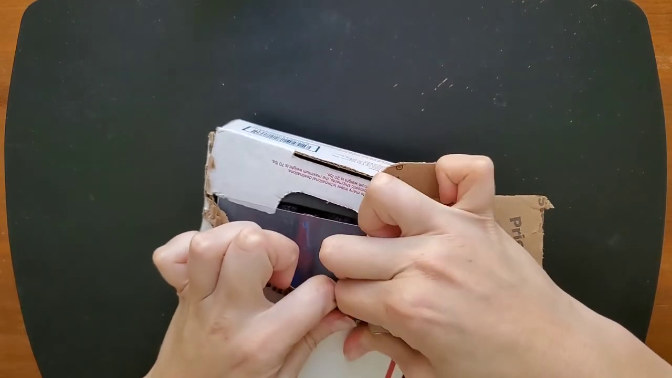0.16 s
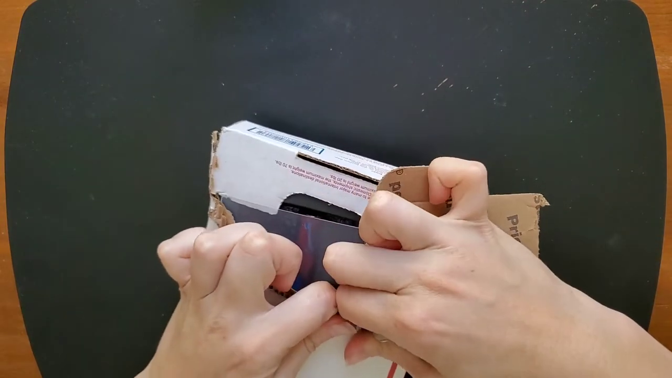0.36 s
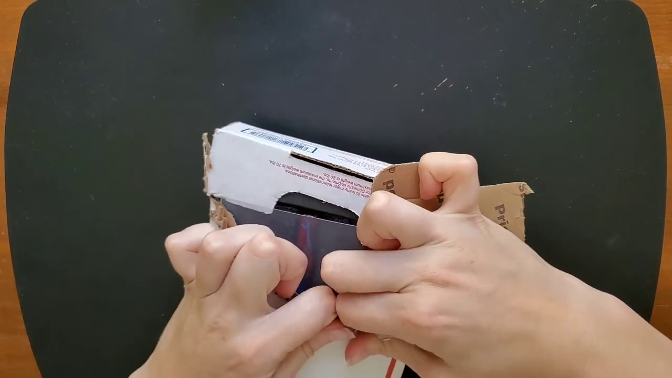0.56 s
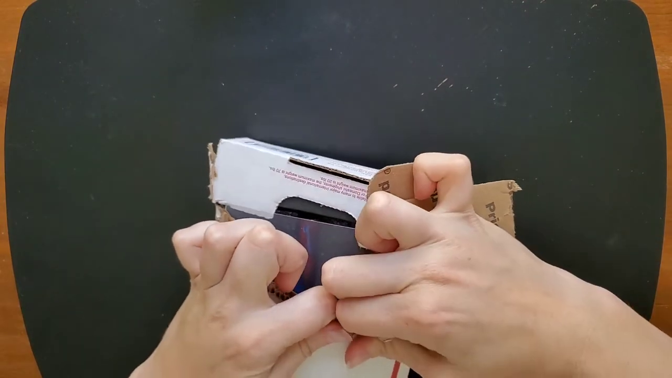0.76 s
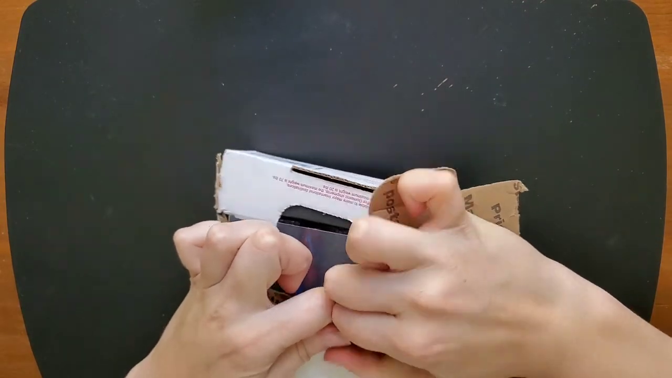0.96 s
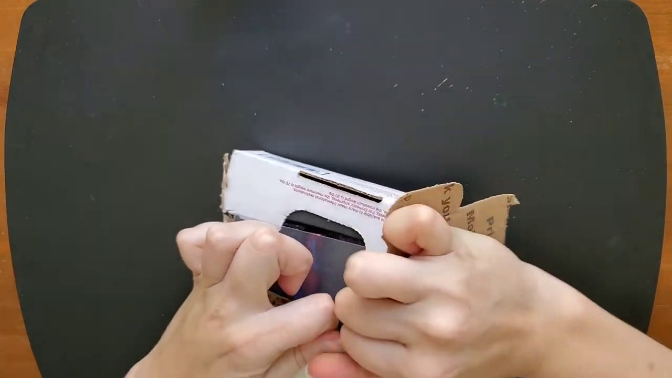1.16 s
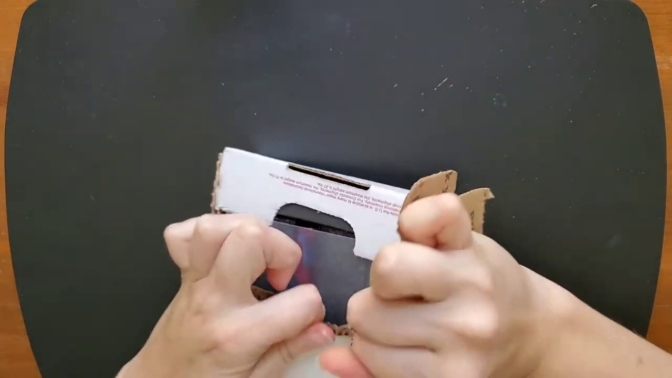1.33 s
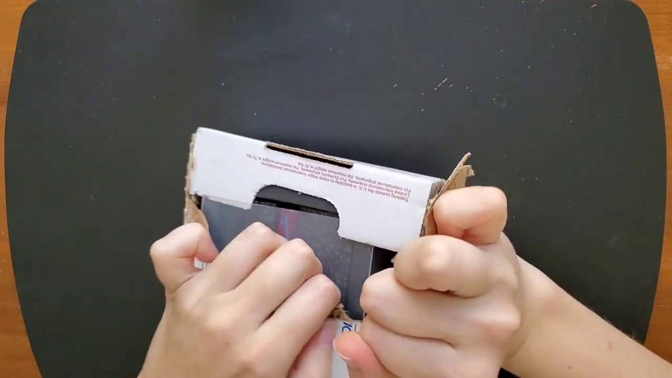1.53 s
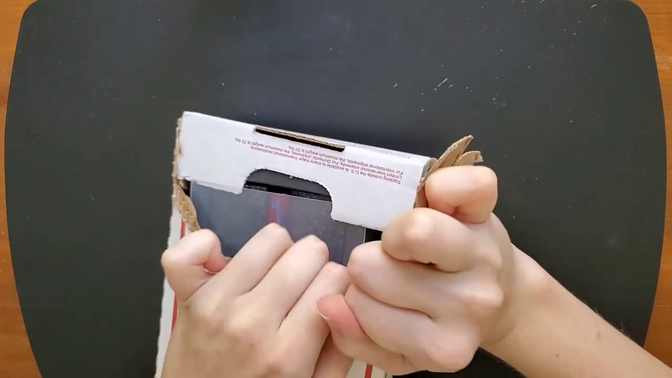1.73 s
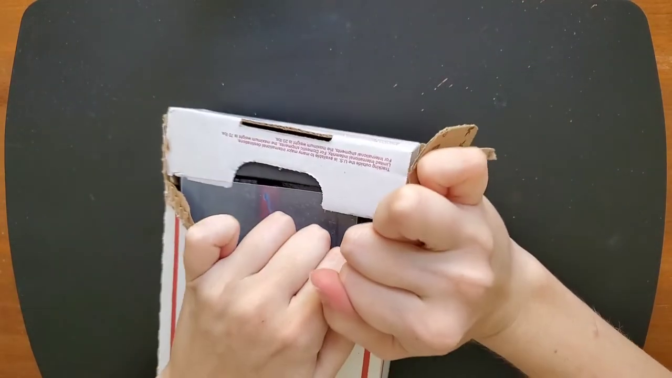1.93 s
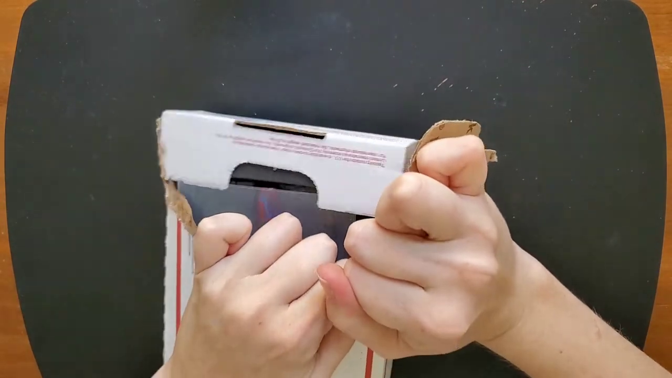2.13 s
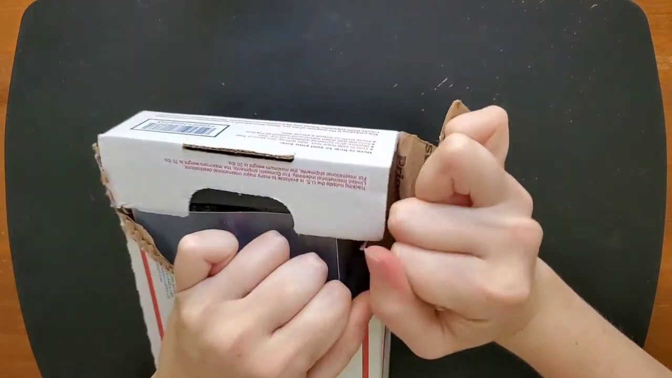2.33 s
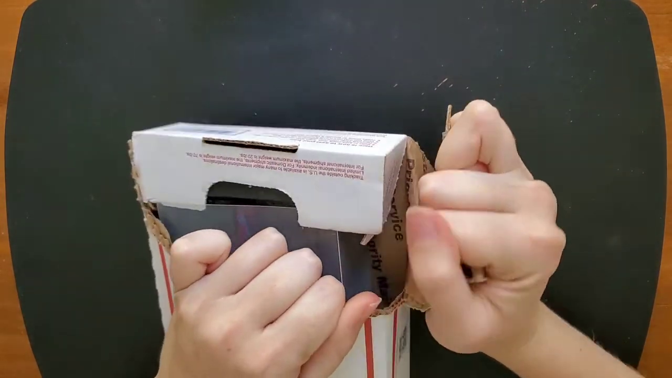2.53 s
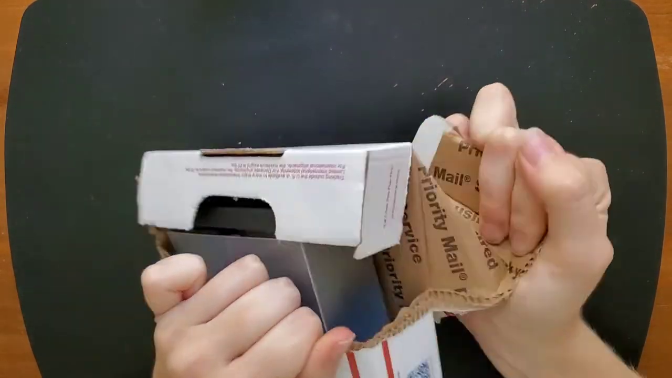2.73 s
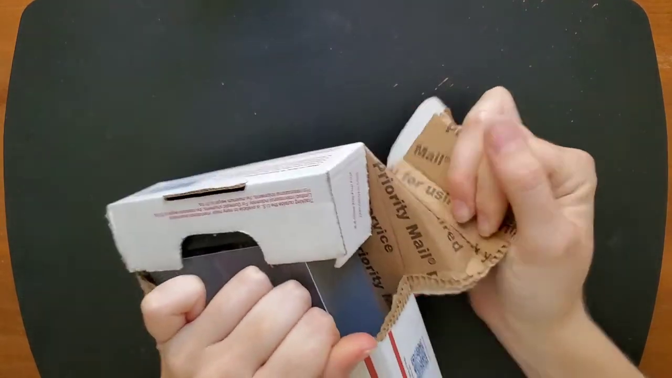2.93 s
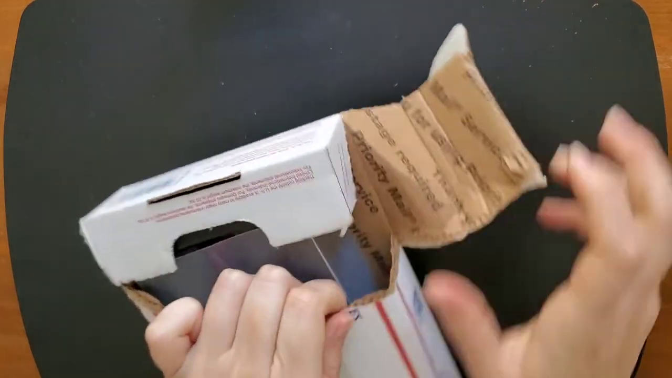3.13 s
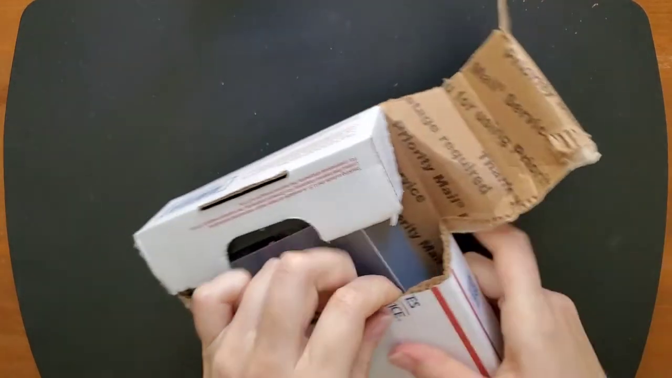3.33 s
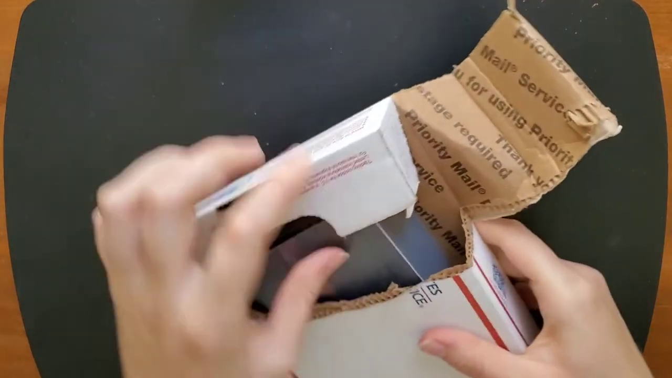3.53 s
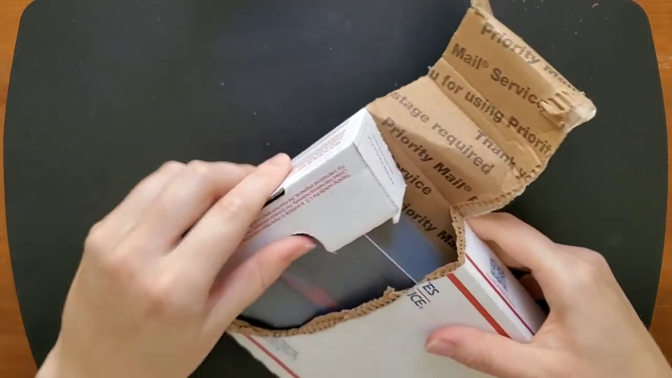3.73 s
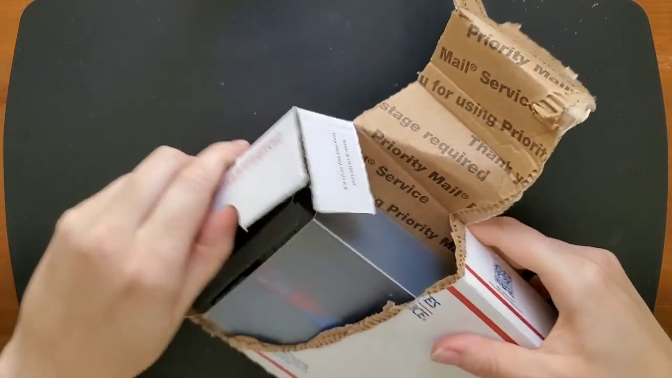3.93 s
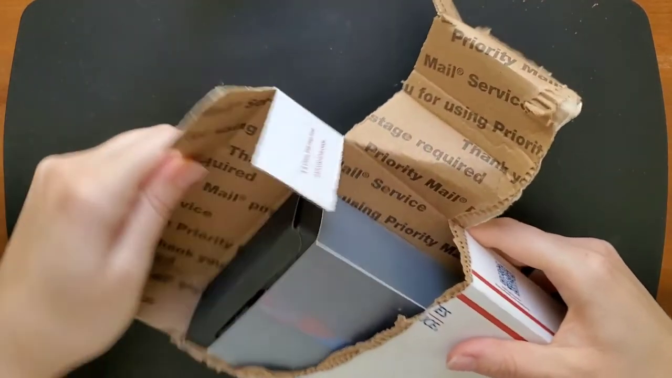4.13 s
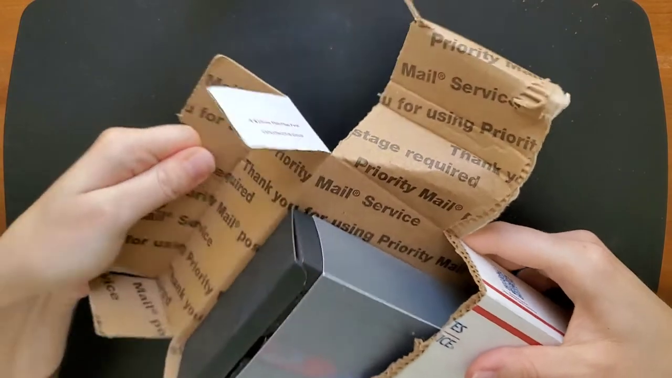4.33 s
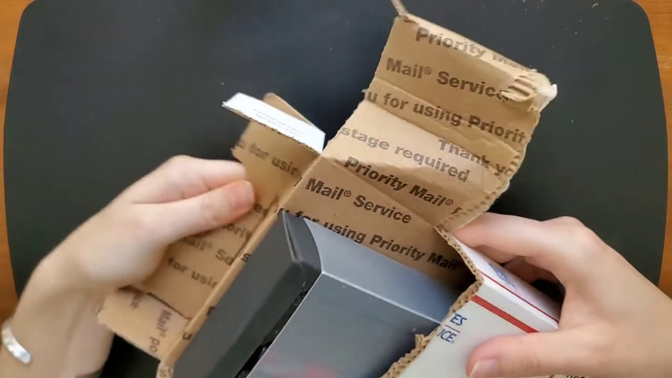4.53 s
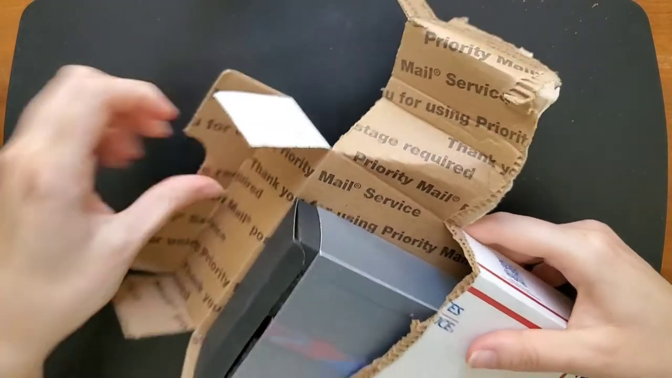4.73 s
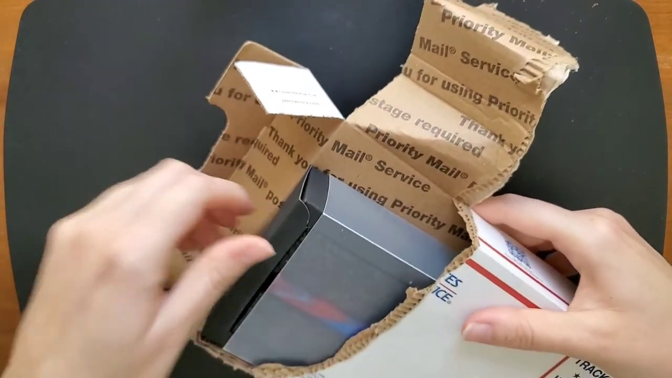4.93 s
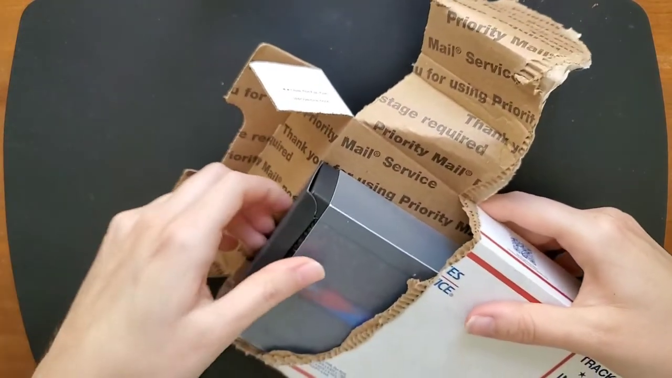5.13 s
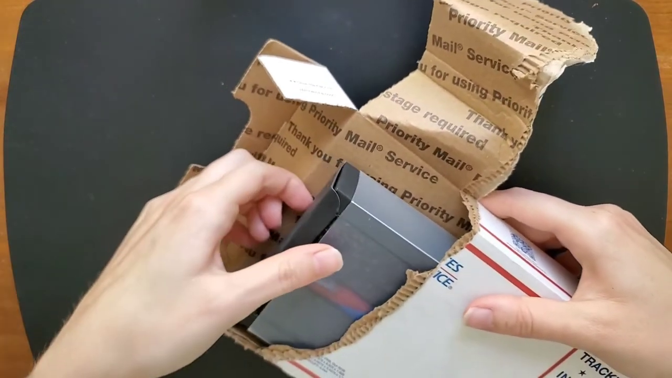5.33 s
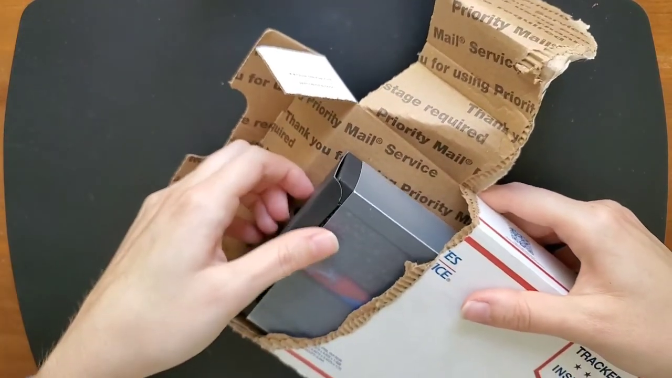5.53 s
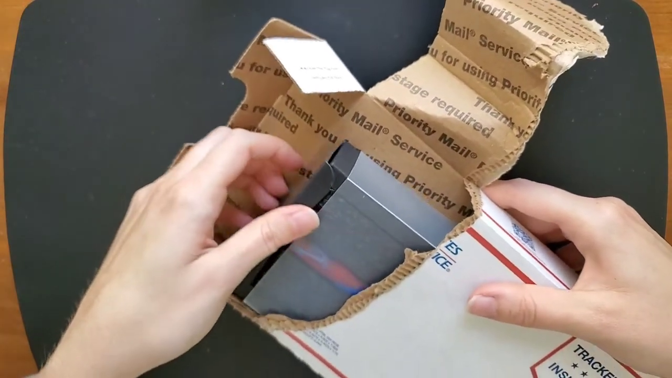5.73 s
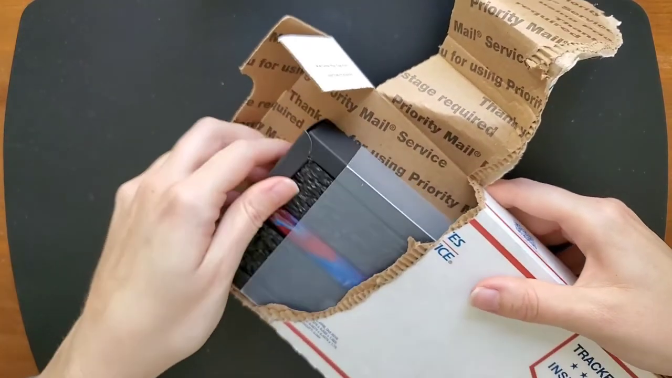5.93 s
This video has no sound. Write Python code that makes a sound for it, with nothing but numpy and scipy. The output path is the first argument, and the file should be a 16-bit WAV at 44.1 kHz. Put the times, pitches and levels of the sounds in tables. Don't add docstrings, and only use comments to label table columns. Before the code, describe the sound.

Close stereo pickup in a small furnished room, with a faint bed of still air. From the start a corrugated box is worked open: low crackles and dull seam pops, then a loud hollow snap around 0.57 s and another pop near 0.65. From 0.85 to 1.1 s come clusters of crunchy ticks with a soft desk bump, then a hard, crisp rip at about 1.26 s. Lighter creaks and crackles fill 1.4 to 2.2 s. A sharp, bright tear bursts at 2.3 s with a low thump, and a dense splitting rip peaks around 2.75 s. After 3 s the force eases: flap flicks, a dull knock near 3.17, papery scrapes around 3.6 to 4.2. A near lull at 4.3 to 4.7 s follows, then quiet fingertip rubbing on a smooth inner box, a distinct pop near 5.08 and small scuffs and ticks around 5.9 s until the end.

```python
import sys
import numpy as np
from scipy import signal
from scipy.fft import rfft, irfft, next_fast_len
from scipy.io import wavfile
from scipy.ndimage import uniform_filter1d, map_coordinates

SR = 44100
rng = np.random.default_rng(int(sys.argv[2]) if len(sys.argv) > 2 else 0)


def natural_amplitude(level_db):
    exponent = np.asarray(level_db, float) / 20
    return 10 ** exponent


def digitize_waveform(pressure):
    field = np.atleast_2d(pressure).T
    bounded = np.clip(field, -1, 1)
    quanta = np.round(bounded * 32767).astype(np.int16)
    wavfile.write(sys.argv[1], SR, quanta)


N = 267246


def unit(x):
    return x / np.sqrt(np.mean(x ** 2) + 1e-20)


def over_time(points):
    return np.interp(np.arange(N) / SR, *np.transpose(points))


def along(points, hz):
    f, v = np.transpose(points)
    return np.interp(np.log(hz + 1), np.log(f + 1), v)


def wobble(rate):
    knots = rng.standard_normal(int(N * rate / SR) + 4)
    return map_coordinates(knots, [np.arange(N) * rate / SR])


def filtered(x, response):
    m = next_fast_len(x.shape[-1] + 4096)
    spectrum = rfft(x, m) * response(np.fft.rfftfreq(m, 1 / SR))
    return irfft(spectrum, m)[..., :x.shape[-1]]


def resonance(f, hz, width):
    return 1j * f * width / (hz * hz - f * f + 1j * f * width)


# [f/Hz, likeness 0-1]
PORT_LIKENESS = [(60, 1), (300, 0.74), (1000, 0.24), (3000, 0.092), (15000, 0.049)]


def ports(a, b):
    turn = lambda f: np.arccos(np.clip(along(PORT_LIKENESS, f), -1, 1)) / 2
    mid = filtered(a, lambda f: np.cos(turn(f)))
    side = filtered(b, lambda f: np.sin(turn(f)))
    return np.array([mid + side, mid - side])


# [f/Hz, level/dB per Hz]
AIR_COLOUR = [(15, -62.5), (25, -9.5), (92, -10.5), (134, -40), (195, -15.5), (936, -35), (1070, -23),
              (1840, -35), (2690, -31.5), (16000, -37)]
HUSH_DB = -64.5


def hush():
    air = ports(*rng.standard_normal((2, N)))
    return natural_amplitude(HUSH_DB) * unit(filtered(air, lambda f: natural_amplitude(along(AIR_COLOUR, f))))


# [t/s, force (1 ripping, 0 sliding)]
GRIP_FORCE = [
    (0, 1.07),
    (3.0, 1.035),
    (3.6, 1.16),
    (4.3, 0.83),
    (6.1, 0.19),
]


def grip():
    return over_time(GRIP_FORCE)


# [strongest t/s, level/dB, swell/ms, fade/ms, brightness/dB]
TUGS = [(.09, -47.5, 174, 320, -3), (.19, -51.5, 65, 57, 2), (.38, -46, 110, 124, -1.5),
        (.56, -37, 70, 170, -6.5), (.67, -40.5, 110, 130, 0), (.85, -44, 19, 1100, -9.5),
        (.95, -40, 110, 300, -0.5), (1.04, -42, 210, 110, -5), (1.16, -59, 120, 93, -9),
        (1.26, -24.5, 32, 80.5, 2.5), (1.43, -61, 20, 480, -4), (1.66, -48.5, 470, 500, -0.5),
        (1.909, -45.5, 90, 99, -5.5), (2.08, -48, 190, 180, -5.5), (2.284, -29.5, 49, 60, -2.5),
        (2.316, -21, 14, 50, -1), (2.349, -34, 40, 96, -0.5), (2.51, -58, 88, 76, 9.5),
        (2.583, -40, 15, 150, 2.5), (2.721, -34, 95, 100, 3), (2.762, -19.5, 42, 82.5, 2.5),
        (2.87, -46, 66, 180, 1.5), (3.05, -44, 83, 84, 4.5), (3.097, -55.5, 50, 125, 13.5),
        (1.275, -38, 30, 67, -9), (2.569, -47.5, 4, 20, 3.5), (.47, -45.5, 12, 57, -8.5),
        (1.58, -48, 40, 120, -6)]
# [strongest t/s, level/dB, swell/ms, fade/ms, brightness/dB]
SLIDES = [(3.2, -55, 66, 116, 10), (3.33, -55, 130, 89, 8.5), (3.47, -50, 130, 270, 5.5),
          (3.579, -48, 34, 32, 8), (3.633, -41, 17, 30, -11), (3.775, -49.5, 12, 180, -1),
          (3.887, -39, 118, 79, 0.5), (3.95, -47, 44, 79, 2), (4.039, -44, 55, 30, -0.5),
          (4.199, -41.5, 105, 45, -3), (4.25, -61.5, 67, 73, 8.5), (4.55, -62.5, 160, 670, 5),
          (4.643, -52, 120, 240, 3), (4.8, -58, 160, 90, -4), (4.951, -55, 32, 46, 5.5),
          (5.01, -56.5, 37, 41, 4.5), (5.09, -43, 24, 45, -2.5), (5.135, -60.5, 52, 370, 7),
          (5.311, -45, 110, 88, -5), (5.418, -44.5, 170, 54, -3.5), (5.629, -52, 87, 250, 0.5),
          (5.759, -47, 140, 300, -1), (5.889, -37, 81, 96, 0), (6.03, -41.5, 100, 150, -4),
          (3.37, -63, 100, 96, -15), (3.62, -54.5, 60, 80, -12.5), (3.96, -49.5, 66, 71, -11),
          (4.72, -53.5, 40, 50, -4.5)]
# [level/dB, slope/dB per dB of brightness, change when only sliding/dB]
DRIVE = [
    (-0.4, -0.05, 2),
    (-3.5, .5, 0.5),
    (-5, 1.38, -1.9),
    (-4.5, -0.88, -2.5),
]
STILL_DB = -72.5
BEND = 1.18


def control(column):
    t = np.arange(0, N / SR + .001, .001)
    s, db, swell_ms, fade_ms, bright_db = np.transpose(TUGS + SLIDES)[:, :, None]
    offset_db, slope, slide_db = DRIVE[column - 1]
    only_sliding = (np.arange(len(s)) >= len(TUGS))[:, None]
    away = 1000 * np.abs(t - s) / np.where(t < s, swell_ms, fade_ms)
    stroke_db = db + slide_db * only_sliding + slope * bright_db - 20 * away ** BEND
    power = natural_amplitude(2 * stroke_db).sum(axis=0) + natural_amplitude(2 * STILL_DB)
    return np.interp(np.arange(N) / SR, t, offset_db + 10 * np.log10(power))


def grains(density, spread_db, life):
    sizes = np.minimum(rng.exponential(size=N), 2.5)
    starts = (rng.random(N) < density / SR) * natural_amplitude(spread_db * sizes)
    power = signal.lfilter([1], [1, -np.exp(-2 / (life * SR))], starts ** 2)
    return np.sqrt(np.abs(power))


def showers():
    life_s, strength = 0.006, 2.2
    starts = np.zeros(N)
    for rows in (SEAMS, BUCKLES, CRACKS, FLICKS, SLIPS):
        for row in rows:
            starts[min(round(row[0] * SR) + 60, N - 1)] = strength
    burst = 1 + signal.lfilter([1], [1, -np.exp(-1 / (life_s * SR))], starts)
    return burst / np.sqrt(uniform_filter1d(burst ** 2, size=2600))


def ringing(breaks, modes, wander_db):
    shake = ports(*(breaks * rng.standard_normal((2, N))))
    total = np.zeros((2, N))
    for k, (hz, width, db) in enumerate(modes):
        push = shake * natural_amplitude(wander_db * wobble(14))
        total += (-1) ** k * natural_amplitude(db) * filtered(push, lambda f: resonance(f, hz, width))
    return unit(total)


def coloured(envelope, points):
    noise = ports(*(envelope * rng.standard_normal((2, N))))
    return unit(filtered(noise, lambda f: natural_amplitude(along(points, f))))


def patchy(x, depth_db):
    z = signal.stft(x, nperseg=256)[2]
    field = uniform_filter1d(rng.standard_normal(z.shape[1:]), size=5, axis=0)
    field = uniform_filter1d(field, size=9, axis=1)
    return unit(signal.istft(z * natural_amplitude(depth_db * unit(field)), nperseg=256)[1][:, :N])


# [f/Hz, width/Hz, level/dB]
WALLS = [(616, 47, -2), (810, 43, 1), (937, 81, -1.5), (1110, 123, -2), (1270, 260, -4.5)]
# [f/Hz, width/Hz, level/dB]
FLUTES = [(1560, 170, 0.5), (1880, 290, 2.5), (2140, 154, 2.5), (2415, 210, 1), (2900, 510, -1),
          (3700, 1490, -5.5)]
# [f/Hz, level/dB per Hz]
FIBRE = [(1760, -8.5), (3000, -4.5), (3310, -7.5), (4500, -6.5), (4970, -7.5), (5520, -5.5), (7830, -7),
         (9460, -18.5), (11400, -10.5), (14800, -8.5), (16000, -18)]
# [f/Hz, level/dB per Hz]
HOLLOW = [(110, -51.5), (180, -15.5), (512, 1.5), (566, -6), (616, -21.5), (750, 0), (980, -33),
          (1650, -120)]


def tearing():
    force = np.clip(grip(), 0, 1.5)
    shower = showers()
    breaks = unit(grains(410, 2.6, 0.0035)) * natural_amplitude(1.5 * wobble(30.09))
    breaks = breaks ** (0.67 * force)

    wall_breaks = shower * (breaks + 0.13) * np.clip(force + 0.19, 0, 1)
    walls = natural_amplitude(control(column=1) - 3.5) * ringing(wall_breaks, WALLS, wander_db=2.6 * force)

    flute_breaks = shower * (breaks + 0.5) * np.clip(force + 0.37, 0, 1)
    flutes = natural_amplitude(control(column=2) + 1.0) * ringing(flute_breaks, FLUTES, wander_db=2.8 * force)
    small = filtered(flutes, lambda f: 1 / (1 + (2300 / (f + 1)) ** 8))
    flutes = flutes - np.clip(0.65 * (1 - force), 0, 1) * small

    fibre = patchy(coloured(shower * (breaks + 0.72), FIBRE), depth_db=2.0)
    fibre = natural_amplitude(control(column=3) + 1.5) * fibre
    sheen = filtered(fibre, lambda f: 1 / (1 + (7500 / (f + 1)) ** 4))
    fibre = fibre - np.clip(0.65 * (1.1 - force), 0, 1) * sheen

    hollow = coloured(shower * (breaks + 0.11) * natural_amplitude(5.3 * wobble(11)), HOLLOW)
    hollow = natural_amplitude(control(column=4) - 2.0) * hollow

    push = rng.standard_normal(N) * natural_amplitude(7.5 * wobble(24) + 0.37 * control(column=4))
    modes = lambda f: sum(natural_amplitude(db) * resonance(f, hz, 2.0 / t60 + 8) for hz, db, t60 in DESK)
    desk = natural_amplitude(-59.0) * force ** 2 * unit(filtered(push, modes))
    return walls + flutes + fibre + hollow + desk


# [f/Hz, width/Hz, level/dB]
PANELS = [(420, 110, -6.5), (820, 110, 5), (1200, 420, -4.5), (1710, 650, 0), (2670, 570, -6.5)]


def panels(f):
    return sum((-1) ** k * natural_amplitude(db) * resonance(f, hz, width) for k, (hz, width, db) in enumerate(PANELS))


# [t/s, peak level/dB, wall f/Hz, flute f/Hz]
SEAMS = [(.06, -37, 770, 1270), (.082, -25.5, 730, 2160), (0.114, -29.5, 475, 1560),
         (.16, -26.5, 740, 1560), (.264, -38.5, 666, 1530), (1.076, -16, 804, 2700),
         (0.417, -29, 810, 1650), (.459, -18, 733, 1650), (.571, -6.5, 820, 1560), (.636, -16, 388, 1180),
         (.685, -13.5, 386, 1800), (1.098, -31, 500, 1270), (1.16, -39, 744, 2060),
         (1.736, -30.5, 437, 1600), (1.887, -27, 476, 1650), (1.992, -35.5, 457, 1590),
         (2.064, -24.5, 420, 1470), (2.163, -27.5, 513, 1600), (2.236, -23, 740, 1900),
         (2.375, -17.5, 820, 1560), (3.172, -26, 520, 1300), (3.44, -31.5, 810, 1380),
         (4.122, -46, 802, 1320), (4.189, -34, 1100, 1900), (4.423, -44, 1155, 1266),
         (4.819, -33, 660, 1590), (5.076, -18, 800, 1450), (5.267, -50, 810, 1700), (5.741, -35, 740, 1390),
         (5.951, -28.5, 820, 2050)]
# [t/s, peak level/dB, wall f/Hz, flute f/Hz]
BUCKLES = [(.19, -26.5, 1110, 1560), (.367, -27, 377, 1200), (.541, -20, 694, 1120),
           (.577, -13.5, 803, 1300), (.705, -27.5, 535, 2420), (.842, -27.5, 716, 1570),
           (.876, -25.5, 1300, 1570), (.896, -26, 504, 2820), (.918, -22.5, 810, 1580),
           (1.007, -27, 393, 1700), (0.308, -38.5, 1270, 1270), (1.262, -7.5, 1220, 1140),
           (1.264, -14.5, 1160, 1420), (1.421, -26.5, 790, 1550), (1.574, -43, 686, 1530),
           (2.047, -31, 420, 1350), (2.109, -30, 726, 1350), (2.285, -24.5, 810, 1220),
           (2.291, -19, 283, 1210), (1.246, -24.5, 1267, 3160), (2.676, -30, 616, 1880),
           (2.785, -17.5, 790, 2320), (3.063, -26, 810, 2400), (3.44, -35, 410, 1670),
           (3.775, -28, 750, 2310), (3.836, -32.5, 1270, 2560), (3.878, -27, 800, 1900),
           (4.799, -45, 780, 1610), (0.505, -39, 740, 1410), (5.137, -34, 800, 1500)]
# [t/s, peak level/dB, wall f/Hz, flute f/Hz]
CRACKS = [(.347, -36.5, 1270, 1240), (.389, -31.5, 371, 2050), (.961, -23.5, 800, 1460),
          (.998, -18, 754, 1760), (1.238, -29.5, 1120, 4200), (2.312, -8, 606, 2700),
          (1.714, -28.5, 420, 1860), (1.905, -27.5, 513, 2900), (2.209, -36, 930.3, 1970),
          (2.271, -22, 800, 2000), (2.569, -36, 714, 1600), (2.6, -30, 784, 1790),
          (2.627, -24.5, 725, 3260), (2.706, -21.5, 1270, 1270), (2.746, -13.5, 1200, 1560),
          (2.763, -11, 990, 2330), (2.787, -21.5, 514, 2180), (3.094, -36, 2200, 6500),
          (3.513, -33.5, 397, 3700), (3.577, -23, 810, 1710), (3.632, -34.5, 1120, 1220),
          (3.713, -37.5, 936, 1270), (3.899, -24, 766, 2140), (4.314, -37, 780, 1940),
          (4.571, -43.5, 810, 2220), (2.096, -45, 766, 2300), (4.637, -42.5, 700, 2110),
          (4.914, -46, 1200, 1290), (5.334, -35, 772, 3820), (5.562, -49, 826, 1695)]
# [t/s, peak level/dB, wall f/Hz, flute f/Hz]
FLICKS = [(3.018, -40.5, 800, 2160), (3.057, -36, 800, 2900), (3.767, -40, 624, 1830),
          (3.939, -33, 479, 2140), (4.016, -41.5, 790, 1800), (4.034, -40.5, 785, 2320),
          (4.763, -33, 750, 1590), (6.054, -30, 990, 2030), (1.6, -37.5, 950, 1660),
          (2.345, -30, 1480, 2900), (2.717, -30.5, 1270, 3150), (2.788, -18.5, 1414, 2223),
          (2.8, -23.5, 713, 2380), (2.302, -23, 600, 1500)]
# [t/s, peak level/dB, wall f/Hz, flute f/Hz]
SLIPS = [(0.213, -32.5, 740, 2360), (0.2682, -46, 520, 1490), (0.856, -28.5, 810.0, 1560),
         (0.862, -27, 920.0, 1590.0), (0.887, -33, 408, 1650.0), (0.93, -30, 440.0, 1690),
         (0.943, -31, 450.0, 1360.0), (0.95, -31, 380.0, 2000.0), (0.972, -27, 588, 1360.0),
         (0.979, -31.5, 790.0, 1840.0), (0.998, -31.5, 521, 1880.0), (1.005, -25.5, 468, 1370),
         (1.018, -21.5, 381, 1760), (1.029, -26.5, 800.0, 2100.0), (1.035, -24.5, 820.0, 1980.0),
         (1.063, -40, 790.0, 2200.0), (1.225, -42, 710.0, 2080), (1.255, -10, 1180, 1890.0),
         (1.264, -13, 588, 1490), (1.269, -15.5, 1110.0, 1930.0), (1.286, -12.5, 950, 2020),
         (1.302, -14, 870.0, 1564), (1.327, -24, 1030, 1580.0), (1.422, -34.5, 800, 1650),
         (1.545, -39, 564, 1360.0), (1.754, -31.5, 700.0, 1670), (1.793, -33, 850.0, 1670.0),
         (1.864, -35, 1290.0, 1880.0), (2.133, -28.5, 770, 1650), (2.186, -42, 577, 2820.0),
         (2.311, -9, 1200, 3310), (2.318, -14, 2000, 2700), (2.485, -41, 870, 3200.0),
         (2.528, -41.5, 860.0, 3220.0), (2.609, -35, 775, 4160.0), (2.661, -37.5, 678, 1840.0),
         (2.691, -30, 650.0, 1880), (2.729, -19.5, 1230, 1800), (2.744, -12.5, 1046, 1496),
         (2.757, -10, 1137, 2465), (2.788, -18.5, 1300, 2243), (2.797, -13, 1300, 2030.0),
         (2.817, -23, 930.0, 2450.0), (3.0495, -20, 1900, 2900), (4.869, -47, 820.0, 1930),
         (5.227, -42.0, 826, 1700), (5.749, -31.5, 746, 1350), (5.881, -27.5, 1010, 1360),
         (5.897, -25, 1250.0, 1540.0), (5.922, -33, 740, 1780.0)]
# [t/s, peak level/dB, wall f/Hz, flute f/Hz]
SPITS = [(.56, -21, 1200, 4250), (2.094, -39, 757, 4630), (2.187, -35.5, 582, 4520),
         (2.643, -28, 760, 5560), (2.744, -11, 1105, 3840), (2.763, -7, 1000, 4350),
         (3.765, -43, 800, 2420), (4.867, -44, 820, 6000), (4.936, -53, 1300, 3700),
         (4.762, -31, 800, 6850), (5.742, -41, 800, 5970), (1.908, -24.5, 520, 3620)]
# [flute re peak/dB, crackle re peak/dB, rattle length/ratio, level/dB, suddenness/dB]
KINDS = [
    (-12, -22.5, 0.84, -0.23, 1),
    (-6, -20, 0.79, -0.96, 1),
    (-5, -8, 0.92, -1.23, 2.5),
    (5.5, -22.5, 1, -1.2, 3.3),
    (-4, -25, 0.67, -3, 9),
    (8, 3, 0.45, -12, -2.5),
]


def snaps():
    events = []
    for rows, kind in zip((SEAMS, BUCKLES, CRACKS, FLICKS, SLIPS, SPITS), KINDS):
        events += [tuple(row) + tuple(kind) for row in rows]
    columns = np.transpose(events)[:, :, None]
    s, db, wall_hz, flute_hz, flute_db, crack_db, length, kind_db, sudden_db = columns
    t = np.arange(5000) / SR
    noise = rng.standard_normal((len(s), 2, len(t)))
    release = (np.arange(len(t)) == 60) * natural_amplitude(0.083 * (db + 22.5) + sudden_db)
    swell = 1 - np.exp(-(t / (0.0023 * length)) ** 2)

    def blow(kick, t60):
        rattle = natural_amplitude(-60 * t / (t60 * length)) * swell
        return ports(kick * release + noise[:, 0] * rattle, noise[:, 1] * rattle)

    def peak(v):
        return v / np.abs(v).max(axis=(0, 2), keepdims=True)

    wall_modes = lambda f: resonance(f, wall_hz, 0.18 * wall_hz) + 0.32 * panels(f)
    flute_modes = lambda f: resonance(f, flute_hz, 0.25 * flute_hz) ** 2 + 0.16 * resonance(f, 2200, 1400)
    wall = peak(filtered(blow(7.9, 0.042), wall_modes))
    flute = peak(filtered(blow(7.2, 0.032), flute_modes))
    edge = peak(filtered(blow(3.47, 0.036), lambda f: natural_amplitude(along(FIBRE, f))))
    sounds = wall + natural_amplitude(flute_db + 2.0) * flute + natural_amplitude(crack_db + 11.5) * edge
    sounds = sounds * natural_amplitude(db + kind_db)
    out = np.zeros((2, N + len(t)))
    for k, start in enumerate(np.round(s[:, 0] * SR).astype(int)):
        out[:, start:start + len(t)] += sounds[:, k]
    return out[:, :N]


# [t/s, peak level/dB, f/Hz, t60/s]
NOTES = [(.366, -31, 1250, .03), (.367, -36, 343, 0.033), (.309, -40, 1270, .03),
         (1.421, -36.5, 840, 0.077), (1.421, -33, 1593, 0.046), (2.707, -32, 1270, .06),
         (3.062, -31, 800, 0.052), (4.045, -26.5, 1910, 0.028), (4.764, -44, 4040, .04),
         (4.764, -39.5, 802, 0.064), (5.078, -31.5, 1984, 0.063), (5.078, -35, 2923, 0.047),
         (5.08, -34, 810, .05), (1.245, -26, 3100, 0.072), (2.3125, -6, 1000, .01), (2.316, -18, 560, .07),
         (4.017, -39, 1850, .09), (4.197, -35, 630, .04), (4.19, -43, 2570, .08), (3.014, -38, 2150, .1),
         (1.263, -11, 900, .012), (4.036, -39, 790, .07)]
NOTE_RISE_CYCLES = 2.2


def notes():
    out, t = np.zeros(N + 5000), np.arange(5000) / SR
    for s, db, hz, t60 in NOTES:
        rise = 1 - np.exp(-t * hz / NOTE_RISE_CYCLES)
        ring = natural_amplitude(db + 3.0 - 60 * t / t60) * rise * np.sin(2 * np.pi * hz * t)
        out[round(s * SR):][:len(t)] += ring
    return out[:N]


# [t/s, peak level/dB, slap re peak/dB, tilt of upper desk modes/dB per octave]
BUMPS = [(5.745, -61, 16, 19), (0.367, -52, 17.5, 1), (0.685, -50, 21, 4), (0.795, -49, 9.5, -9),
         (1.099, -32.5, 7, 4), (1.264, -49, 0.5, 3.5), (1.421, -45, -1, -1), (1.714, -56, -5, -4),
         (1.903, -56.5, 19.5, 15.5), (2.238, -46, 9, 1.5), (2.295, -28.5, -4, 2.2), (2.764, -39.5, -1.5, 1),
         (3.173, -31.5, 2, -7), (3.433, -45, -4, -5), (3.897, -41.5, 8.5, 9), (3.944, -58, 26, -5),
         (5.141, -68, 21.5, 7)]
# [f/Hz, level/dB, t60/s]
DESK = [(68.4, 1, 0.25), (87, 2.5, 0.22), (112, 3.5, 0.12), (146, 1, 0.18)]


def bumps():
    out, t = np.zeros((2, N + SR)), np.arange(SR // 2) / SR
    for s, db, slap_db, tilt_db in BUMPS:
        ring = np.zeros(len(t))
        for hz, level, t60 in DESK:
            mode_db = level + rng.normal(0, 2.1) + tilt_db * np.log2(hz / 90)
            ring += natural_amplitude(mode_db - 60 * t / t60) * np.sin(2 * np.pi * hz * t)
        ring *= 1 - np.exp(-t / 0.0016)
        puff = rng.standard_normal((2, len(t))) * natural_amplitude(-60 * t / 0.062) * (1 - np.exp(-t / 0.00097))
        slap = filtered(ports(*puff), lambda f: resonance(f, 310, 330) ** 2)
        slap = natural_amplitude(slap_db + 3.5) * slap / np.abs(slap).max()
        start = round(s * SR)
        out[:, start:start + len(t)] += natural_amplitude(db + 1.0) * (ring + slap)
    return out[:, :N]


# [f/Hz, width/Hz, level/dB]
SHEEN = [(3200, 300, -2.5), (4060, 340, -2.5), (4720, 270, -3.5), (5300, 430, -3.5), (7000, 510, -9.5)]
# [f/Hz, width/Hz, level/dB]
LID = [(450, 57, 1), (800, 90, 4.5), (1250, 130, -4), (1665, 100, -5), (2060, 110, -3)]


def rubbing():
    sliding = np.clip(1 - grip(), 0, 1) ** 0.37
    rub = unit(grains(780, 2.9, 0.003)) + 1.2
    sheen = natural_amplitude(control(column=3) - 1.0) * ringing(rub, SHEEN, wander_db=3.5)
    lid = natural_amplitude(control(column=4) + 4.0) * ringing(rub, LID, wander_db=2.5)
    return sliding * (sheen + lid)


# [f/Hz, t60/s]
ROOM = [(100, 0.32), (1000, 0.11), (4000, 0.12), (15000, 0.16)]


def room(x):
    hz, t, z = signal.stft(rng.standard_normal((2, SR // 2)), SR, nperseg=256)
    decay = natural_amplitude(-60 * t / along(ROOM, hz)[:, None])
    tail = signal.istft(z * decay, SR, nperseg=256)[1]
    delayed = np.pad(x, ((0, 0), (200, 0)))
    return signal.fftconvolve(delayed, tail / np.linalg.norm(tail[0]), axes=1)[:, :N]


# [t/s, left-right level/dB]
LEAN = [(0, -0.4), (1.2, -0.5), (2.1, 0.5), (2.4, -0.5), (3, -2), (4.199, -1), (4.75, 1.5), (5, -2),
        (6.06, -2)]
# [t/s, delay/samples]
LAG = [(0, 5), (2.2, 5), (3.9, 7), (4.1, -1), (5.4, -4), (5.6, 8)]


def scene():
    air = hush()
    box = tearing() + snaps() + notes()
    desk = bumps()
    box = (box + rubbing()) * natural_amplitude(np.outer([.5, -.5], over_time(LEAN)))
    late = np.round(over_time(LAG)).astype(int)
    left = box[0][np.clip(np.arange(N) - late, 0, N - 1)]
    box = np.array([left, box[1]])
    return box + desk + room(natural_amplitude(-6.5) * box + natural_amplitude(-21.5) * desk) + air


def top_cut(x):
    return signal.sosfilt(signal.butter(12, 16260, fs=SR, output="sos"), x)


def record(dry):
    band = lambda f: (1j * f / (45 + 1j * f)) ** 3 / (1 + (f / 15800) ** 60)
    sound = filtered(dry, band)
    sound = sound / (1 + np.abs(sound / .95) ** 6) ** (1 / 6)
    return top_cut(sound)


dry = scene()
out = record(dry)
digitize_waveform(out)
```